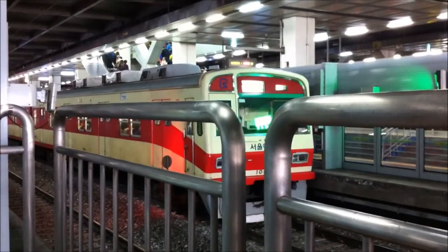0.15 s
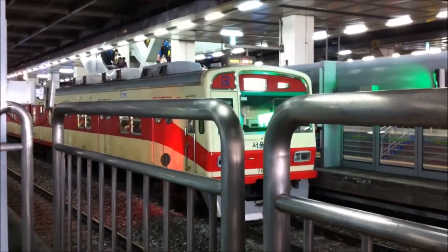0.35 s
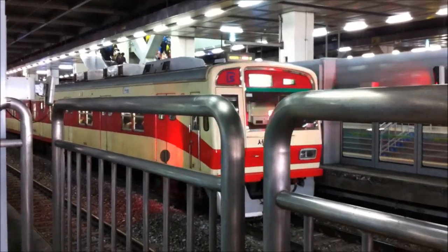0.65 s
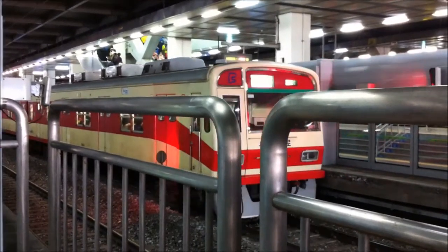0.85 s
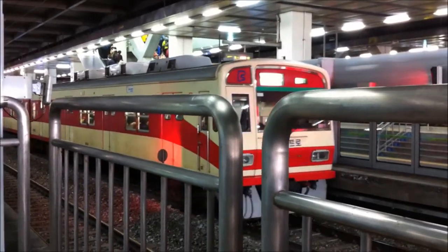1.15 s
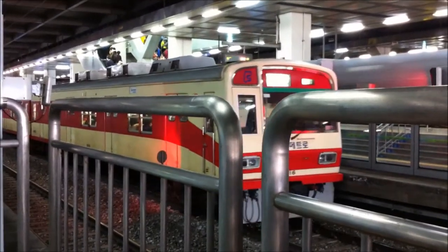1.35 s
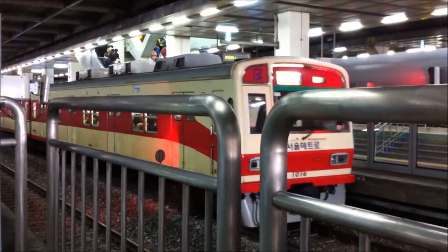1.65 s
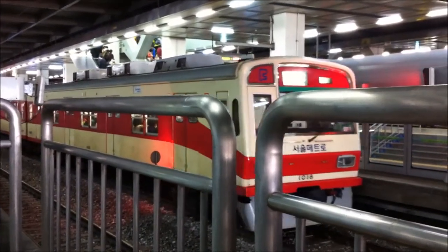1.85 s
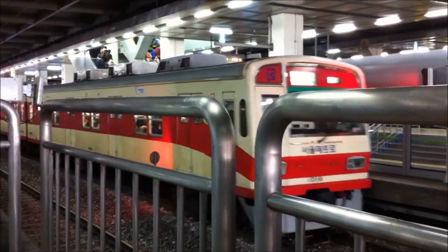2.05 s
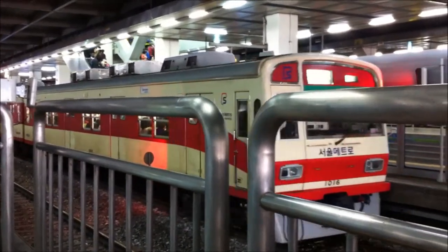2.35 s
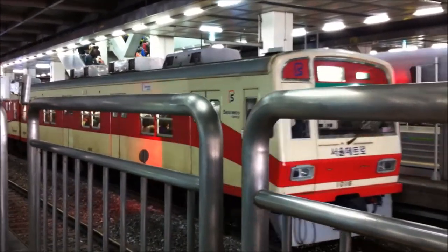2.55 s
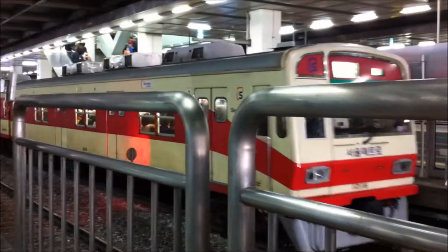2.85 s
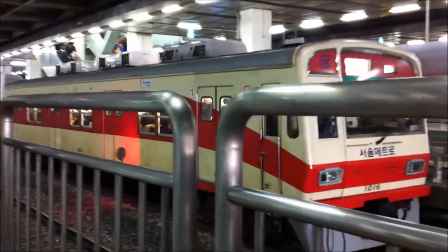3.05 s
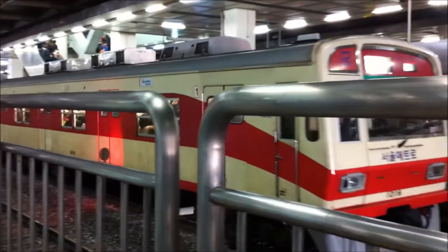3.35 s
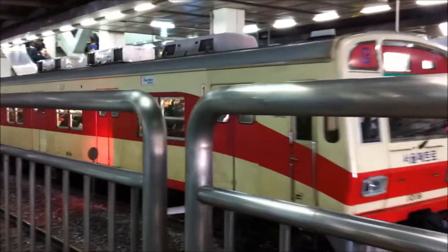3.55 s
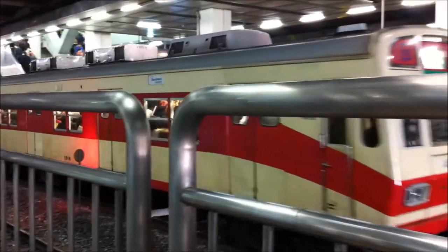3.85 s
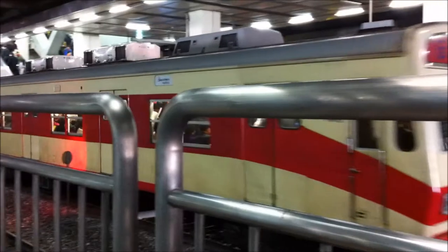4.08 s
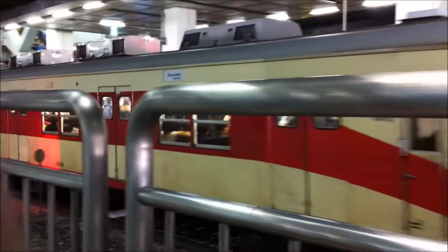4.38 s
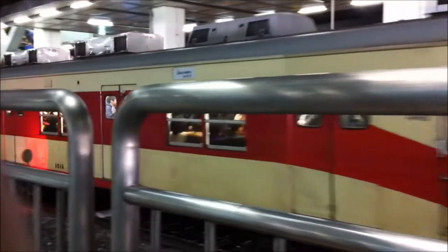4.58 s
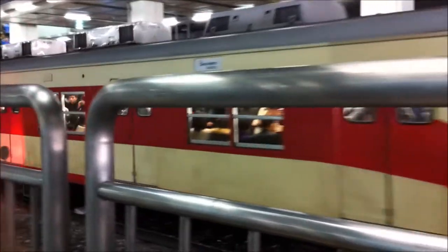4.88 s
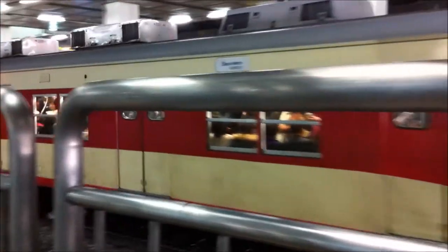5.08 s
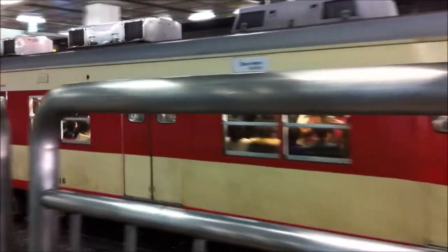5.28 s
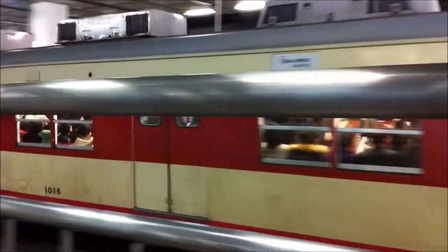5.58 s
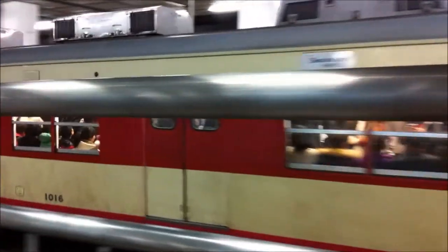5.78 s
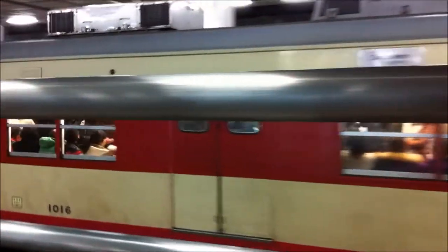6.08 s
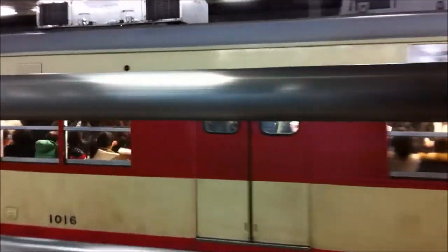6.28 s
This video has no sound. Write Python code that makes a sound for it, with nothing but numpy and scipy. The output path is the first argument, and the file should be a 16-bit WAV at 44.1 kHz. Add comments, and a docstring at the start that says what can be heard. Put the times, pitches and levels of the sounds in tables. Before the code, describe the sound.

A low, hollow motor and fan drone fills a covered platform. Fabric-like rubbing and a cluster of crisp clicks occur right at the microphone in the first second, then faint high brake squeaks. Just after two seconds bright pressurised air rushes out, dominating everything, with some mid-range rolling roar beneath. It thins gradually, broken by tiny dropouts, as the train creeps past and the hum persists.

```python
"""An electric train creeps along a roofed platform; fans and motors rumble and hum throughout.
Rustles and ticks close to the microphone fill the first second, beside a thin high whine and soft bumps.
Brakes squeak faintly from 1.1 s; at 2.1 s a valve opens, air hisses out and the wheels roar.
The hiss fades as the tank empties and the car rolls past, with brief dips in parts of the sound.
Air, wheels, motors and rustles are shaped noise; hum, whine and squeaks are wavering sine waves."""
import sys
import numpy as np
from scipy import signal
from scipy.io import wavfile
from scipy.ndimage import uniform_filter1d

SR = 44100
rng = np.random.default_rng(int(sys.argv[2]) if len(sys.argv) > 2 else 0)


def wrap_up_sound(samples):
    """Save the sound to the file named by the first command line argument, as 16-bit audio."""
    columns = np.atleast_2d(samples).T
    # keep every value between -1 and 1, then stretch to whole-number steps
    tamed = np.clip(columns, -1, 1)
    steps = np.round(tamed * 32767).astype(np.int16)
    wavfile.write(sys.argv[1], SR, steps)


N = 283342


def jet(t):
    """Turbulent air from a valve is smooth, bright noise that turns duller as it weakens."""
    # the valve cracks, opens wide, then tank and distance thin the jet: time_s, level_db
    jet_levels = [(2.1, -58), (2.115, -32), (2.25, -25), (2.34, -17.5), (2.45, -16), (3.3, -18.5),
                  (3.95, -20), (4.28, -20), (4.75, -23.5), (5.98, -26), (6.15, -29), (6.42, -31)]
    # colours of the strong and of the weak jet: pitch_hz, relative level_db per Hz
    bright_colour = [(1200, -44), (2000, -30), (3000, -20.5), (4500, -14), (6500, -11), (8200, -6),
                     (10900, -1), (13000, -1.5), (15800, -5)]
    dull_colour = [(1200, -36), (2000, -28), (3000, -12.5), (4000, -11.5), (6000, -5.5), (9000, -5.5),
                   (11600, -2), (13000, -3), (15800, -2.5)]
    # share of the dull colour gained per dB below the loudest moment, and its upper limit
    dull_opening, dull_fading, dull_most = 0.0099, 0.094, 0.9
    top_s, top_db = max(jet_levels, key=lambda row: row[1])

    def dull_share(s):
        db_below_top = top_db - along(jet_levels, s)[0]
        share_per_db = np.where(s < top_s, dull_opening, dull_fading)
        return np.minimum(share_per_db * db_below_top, dull_most)

    air = blended(dull_share, bright_colour, dull_colour, patchy_db=.5, flicker_db=.6)
    valve_open = t > jet_levels[0][0]
    return gain_of(along(jet_levels, t)[0]) * valve_open * air


def rumble(t):
    """Fans and motors make broad noise, lifted at the pitches where hollow spaces ring."""
    # loudness of the rumble: time_s, level_db
    rumble_levels = [(0, -28), (.3, -30), (.7, -28.5), (1.5, -29.5), (3, -29), (6.42, -28)]
    # colour of the rumble: pitch_hz, relative level_db per Hz
    rumble_colour = [(25, -58), (75, -44), (110, -30), (135, -27), (152, -8.5), (195, -14.5), (275, -13.5),
                     (295, -5), (480, -4), (530, -5.5), (900, -8), (1400, -15.5), (3400, -38),
                     (7000, -50.5), (12000, -40), (15800, -50)]
    # hollow spaces under the cars: pitch_hz, width_hz, boost_db
    hollows = [(208.5, 7.8, 9.5), (251, 35, 7.5), (309, 52, 4), (336.4, 20, 2.5), (470, 30, 3),
               (900, 180, 1)]

    def colour_db(hz, s):
        boost_db = sum(db / (1 + (2 * (hz - f) / width) ** 2) for f, width, db in hollows)
        return read(rumble_colour, hz) + boost_db

    motors = noise(colour_db, size=4096, patchy_db=.6, flicker_db=.5)
    return gain_of(along(rumble_levels, t)[0]) * motors


def roll(t):
    """Steel wheels, and the air blast thrown back by the platform, make a mid-range roar."""
    # loudness as the cars draw level and pass: time_s, level_db
    roll_levels = [(2.0, -54), (2.5, -32.5), (3.3, -36.5), (4, -43.5), (5, -43.5), (5.6, -40),
                   (6.42, -41.5)]
    # colour of the roar: pitch_hz, relative level_db per Hz
    roll_colour = [(500, -30), (1000, 2), (1600, -4), (2500, -4.5), (4000, -5), (7000, -12)]
    roar = noise(lambda hz, s: read(roll_colour, hz), size=1024, patchy_db=3.5, flicker_db=1.2)
    return gain_of(along(roll_levels, t)[0]) * roar


def hum():
    """Magnetic parts hum at nearly steady pitches; fan blades give looser tones."""
    # electrical hum: pitch_hz, level_db
    coil_tones = [(119.5, -66), (234.8, -39.5)]
    # fan blade tones: multiple of the passing rate, level_db
    blade_tones = [(1, -51), (2, -48), (3, -43.5)]
    blades_hz = 161.7  # blades passing per second
    coils = sum(gain_of(db) * fuzzy_tone(hz, 1, 8, .2) for hz, db in coil_tones)
    blades = sum(gain_of(db) * fuzzy_tone(k * blades_hz, 3.0, 9.3, 0.49) for k, db in blade_tones)
    return coils + blades


def squeaks(t):
    """Brake shoes stick and slip, which makes a rough stack of tones at multiples of one pitch."""
    # squeaks: start_s, length_s, base pitch_hz, base level_db before the swell,
    # extra_db for multiples above six, pitch waver as a share of the pitch
    squeak_rows = [(1.12, .2, 1193, -60, 1, .004), (1.68, .05, 1190, -63, -6, .006),
                   (1.9, .12, 1190, -62, 3, .012)]
    # tones in each squeak: multiple of the base pitch, level_db relative to the base level
    partials = [(3, -3), (4, -3), (5, -7), (6, -10), (7, -4), (8, -8)]
    out = np.zeros(N)
    for s, length, hz, db, top_db, spread in squeak_rows:
        at, count = round(s * SR), round(length * SR)
        swell = np.sin(np.pi * t[:count] / length) ** 0.39
        for k, part_db in partials:
            tone = fuzzy_tone(k * hz, spread * k * hz, 150, .5, count)
            level_db = db + part_db + top_db * (k > 6)
            out[at:at + count] += gain_of(level_db) * swell * tone
    return out


def rustle(t):
    """Rubbing makes grainy noise that crackles, and a few sharp ticks that ring a small hard part."""
    # rustles, each one swell: middle_s, half_length_s, level_db, share of the dull colour (0-1)
    rustle_rows = [(.06, .09, -56, .25), (.28, 0.076, -58, .3), (.52, .018, -54, .3), (.585, .02, -57, .2),
                   (0.722, 0.023, -34.5, 0.82), (0.762, 0.029, -37, 0.73), (0.817, 0.03, -40, 0.96),
                   (.872, .012, -50, .8), (0.903, 0.021, -43.5, 0.6), (0.943, 0.016, -40, .5),
                   (0.963, .008, -41, .4), (.985, .015, -47, 0.8), (1.73, 0.065, -53.5, 0.4),
                   (1.955, 0.046, -48, 0.1)]
    # the two colours of rubbing: pitch_hz, relative level_db per Hz
    bright_colour = [(2000, -17), (4000, -21), (6500, -11), (9000, -1), (12400, -3), (14500, -6),
                     (15800, -4)]
    dull_colour = [(700, -16), (1500, 14), (3000, 0), (5000, -6.5), (7000, -8), (9500, -4.5), (12300, 1.5),
                   (14200, 1), (15800, -12)]
    # ticks: start_s, snap strength_db, snap pitch_hz, strength_db of the ringing part
    ticks = [(0.1101, -34, 12600, -49), (0.1476, -44, 12000, -56), (0.2049, -39, 12500, -55),
             (0.5836, -36, 13600, -52), (0.7364, -28, 12600, -50), (0.7864, -35, 10900, -52),
             (0.8954, -31, 12200, -48), (0.93, -32, 12300, -40), (0.9338, -23, 12300, -39),
             (0.9425, -38, 12300, -40), (0.951, -32, 12300, -38), (0.9662, -26, 12500, -39),
             (0.978, -32, 12100, -42)]
    # small hard part: middle pitch_hz (each tick shifts it a little), relative level_db, decay_s
    hard_part = [(3870, -8, .002), (4950, -8, 0.0022), (5300, 2, 0.0027), (6200, -12, .0015),
                 (8300, -5, .002)]
    tick_decay_s = 0.00054
    shapes = [row[:3] for row in rustle_rows]
    shares = np.array([row[3] for row in rustle_rows])

    def dull_share(s):
        power = swells(shapes, s)
        return shares @ power / power.sum(0)

    rubbing = blended(dull_share, bright_colour, dull_colour, patchy_db=2, flicker_db=3)
    out = np.sqrt(swells(shapes, t).sum(0)) * rubbing
    out = out * gain_of(0.91 * wander(900))  # fibres catch and let go

    u = t[:900]  # time since the tick, in seconds
    for s, db, hz, body_db in ticks:
        body = np.zeros(len(u))
        for f, part_db, decay_s in hard_part:
            tone = np.sin(2 * np.pi * f * rng.uniform(0.97, 1.04) * u)
            body += gain_of(part_db) * tone * np.exp(-u / decay_s)
        snap = np.sin(2 * np.pi * hz * u) + 0.51 * rng.standard_normal(len(u))
        snap = snap * np.exp(-u / tick_decay_s)
        at = round(s * SR)
        out[at:at + len(u)] += gain_of(db) * snap + gain_of(body_db) * body
    return out


def bumps(t):
    """The hand that holds the microphone makes soft bumps, each one slow push and release."""
    # bumps: start_s, strength_db (the peak lies about 7 dB lower)
    bump_rows = [(0.091, -47), (0.568, -46), (0.765, -53), (0.918, -46), (2.086, -51)]
    out = np.zeros(N)
    for s, db in bump_rows:
        u = np.maximum(t - s, 0) / 0.0062  # time since the start, in steps of 6.2 ms
        out += gain_of(db) * u * (2 - u) * np.exp(-u)
    return out


def whine(t):
    """A thin, unsteady, very high tone swells now and then while its pitch slowly sags."""
    # swells of the whine: middle_s, half_length_s, level_db
    whine_swells = [(.28, .04, -59), (.41, .03, -61), (.49, .03, -63), (1.13, .13, -59.5),
                    (1.27, 0.014, -51.5), (1.34, .04, -60), (1.55, .16, -65.5), (1.74, .04, -61.5),
                    (1.86, .06, -67)]
    start_hz, sag_hz_per_s = 12460, 60
    tone = fuzzy_tone(start_hz - sag_hz_per_s * t, 40, 150, 0.57)
    return np.sqrt(swells(whine_swells, t).sum(0)) * tone


def dipped(x):
    """Parts of the sound dip briefly, each in its own pitch band, with quick edges."""
    # dips: middle_s, half_length_s, depth_db, low_hz, high_hz
    dip_rows = [(.4, .009, -11, 3000, 16000), (.809, .006, -11, 3500, 8950), (.809, .006, -2, 11000, 16000),
                (0.849, .007, -5, 2800, 12000), (0.924, .005, -6, 5000, 16000),
                (2.098, 0.0029, -12, 4800, 16000), (2.363, 0.0073, -7, 1800, 3800),
                (2.409, 0.0088, -12.5, 100, 7000), (2.493, 0.013, -10.5, 800, 6900),
                (2.568, 0.013, -8, 1800, 3500), (2.922, .008, -4, 2000, 4000),
                (2.968, 0.015, -7, 1800, 4500), (3.02, 0.021, -1, 1700, 4000), (3.128, .01, -9, 1700, 4000),
                (3.318, .009, -7, 1700, 4500), (3.222, .008, -4, 1700, 4500), (3.36, 0.007, -3, 1700, 5000),
                (3.418, 0.014, -18, 1600, 3780), (3.456, 0.02, -1, 1700, 4500),
                (3.522, 0.0091, -7, 1500, 3200), (3.57, .009, -8, 1700, 4000),
                (3.615, .0075, -4, 1700, 4500), (3.685, .009, -9, 1800, 5000), (3.733, .01, -4, 1700, 5000),
                (3.803, .012, -5, 1700, 4000), (3.883, 0.019, -10, 1800, 3970),
                (4.001, 0.038, -27.5, 1900, 3600), (4.101, 0.023, -28, 1400, 6170),
                (4.103, 0.017, -2.5, 6200, 16000), (4.192, 0.055, -23.5, 1910, 3250),
                (4.391, 0.01, -8.5, 100, 9000), (4.343, 0.013, -11, 1800, 4100),
                (4.427, 0.028, -18, 1900, 3250), (4.499, 0.01, -11, 1500, 9600),
                (4.653, .04, -5, 2000, 3160), (4.698, 0.02, -15, 900, 9500),
                (4.704, .013, -5, 11900, 16000), (4.82, 0.034, -10, 2200, 3140),
                (4.97, 0.027, -15, 1800, 3000), (6.182, 0.01, -12, 1300, 7000),
                (6.183, .007, 0, 7000, 14500), (6.326, 0.014, -8, 2870, 8900),
                (6.325, 0.013, -6, 11500, 16000)]
    hz, s, z = signal.stft(x, SR, nperseg=256, noverlap=192)
    at, half, db, low_hz, high_hz = np.transpose(dip_rows)
    above_low = 1 + (low_hz / (hz[:, None] + 1)) ** 20
    below_high = 1 + (hz[:, None] / high_hz) ** 20
    bands = db / above_low / below_high
    moments = np.exp(-((s[:, None] - at) / half) ** 6)
    z = z * gain_of(bands @ moments.T)
    return signal.istft(z, SR, nperseg=256, noverlap=192)[1][:N]


def gain_of(db):
    """Turns decibels into a factor."""
    return 10 ** (np.asarray(db) / 20)


def evened(x):
    """Scales a signal to an average strength (rms) of 1."""
    return x / np.sqrt(np.mean(x ** 2) + 1e-20)


def read(points, hz):
    """Reads a colour table at the pitches hz, evenly in log pitch between its points."""
    f, value = np.transpose(points)
    return np.interp(np.log(hz + 1), np.log(f + 1), value)


def along(rows, t):
    """Reads each column of a time table at the times t, in straight lines between its points."""
    s, *columns = np.transpose(rows)
    return [np.interp(t, s, column) for column in columns]


def swells(rows, t):
    """Gives the power of each bell-shaped swell (middle_s, half_length_s, level_db) at the times t."""
    bells = [gain_of(2 * db) * np.exp(-((t - s) / half) ** 2) for s, half, db in rows]
    return np.array(bells) + 1e-20


def wander(per_s, count=N):
    """Drifts up and down at random with rms 1; a higher per_s drifts faster."""
    size = max(3, int(SR / per_s))
    once = uniform_filter1d(rng.standard_normal(count), size)
    return evened(uniform_filter1d(once, size))


def fuzzy_tone(hz, waver_hz, per_s, depth, count=N):
    """Makes a sine of rms 1 whose pitch and strength waver."""
    turns = np.cumsum(hz + waver_hz * wander(per_s, count)) / SR
    sine = np.sin(2 * np.pi * (turns + rng.random()))
    return evened(sine * (1 + depth * wander(per_s, count)))


def noise(colour_db, size, patchy_db, flicker_db):
    """Makes noise of rms 1 whose colour, given over Hz and s, drifts in patches and flickers."""
    hop = size // 4
    frames, hz = N // hop + 5, np.fft.rfftfreq(size, 1 / SR)[:, None]
    a, b, patches, flicker = rng.standard_normal((frames, len(hz), 4)).T
    # patches are smooth over pitch and time; flicker is wide in pitch and quick
    patches = uniform_filter1d(uniform_filter1d(patches, size // 80, axis=0), 4096 // hop, axis=1)
    flicker = uniform_filter1d(uniform_filter1d(flicker, size // 8, axis=0), 4, axis=1)
    unrest_db = patchy_db * evened(patches) + flicker_db * evened(flicker)
    shape = gain_of(colour_db(hz, np.arange(frames) * hop / SR)) * np.ones((1, frames))
    shape = shape / np.sqrt((shape ** 2).mean(0))  # same power in every frame before the unrest
    z = (a + 1j * b) * shape * gain_of(unrest_db)
    return evened(signal.istft(z, nperseg=size, noverlap=size - hop)[1][:N])


def blended(dull_share, bright, dull, patchy_db, flicker_db):
    """Makes noise that moves between a bright and a dull colour."""
    def colour_db(hz, s):
        share = np.clip(dull_share(s), 0, 1)
        return (1 - share) * read(bright, hz) + share * read(dull, hz)
    return noise(colour_db, size=256, patchy_db=patchy_db, flicker_db=flicker_db)


def scene():
    """All sources reach one microphone, heard alike on both channels."""
    t = np.arange(N) / SR
    train = jet(t) + rumble(t) + roll(t) + hum() + squeaks(t)
    close_by = rustle(t) + bumps(t)
    mix = dipped(train + close_by + whine(t))
    return np.array([mix, mix])


def record(dry):
    """A steep filter removes the pitches above the upper band limit."""
    edge_hz = 15760
    low_pass = signal.firwin(2047, edge_hz, window=("kaiser", 10), fs=SR)
    return signal.oaconvolve(dry, low_pass[None], "same")


dry = scene()
out = record(dry)
wrap_up_sound(out)
```